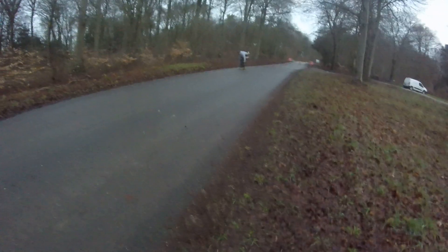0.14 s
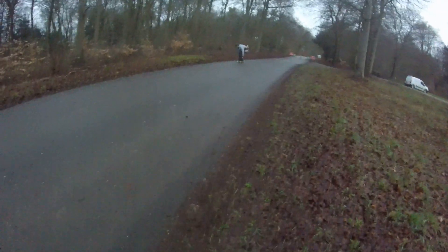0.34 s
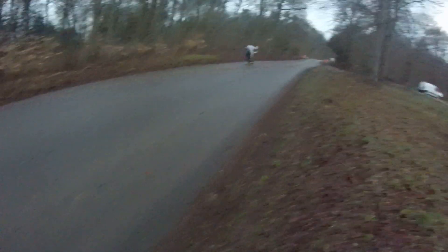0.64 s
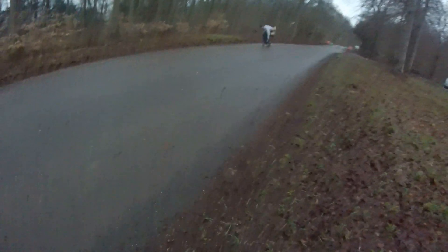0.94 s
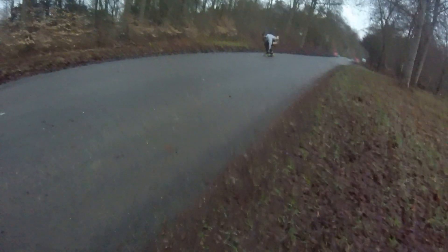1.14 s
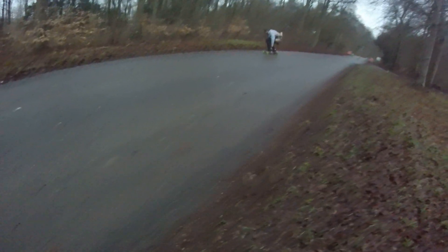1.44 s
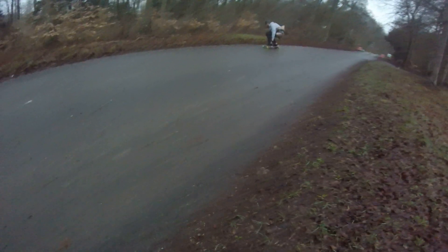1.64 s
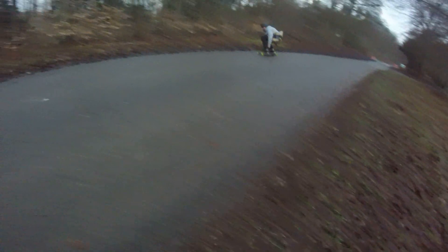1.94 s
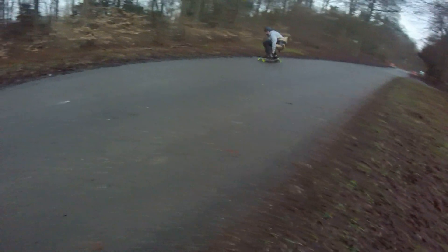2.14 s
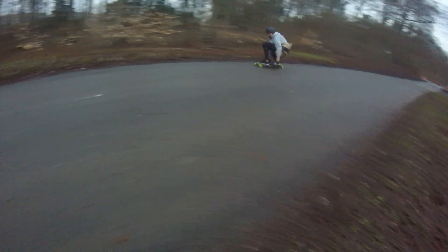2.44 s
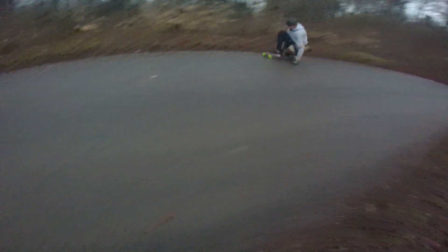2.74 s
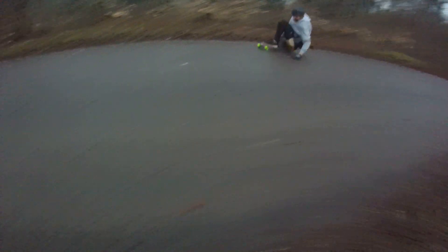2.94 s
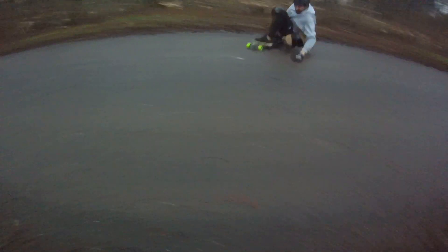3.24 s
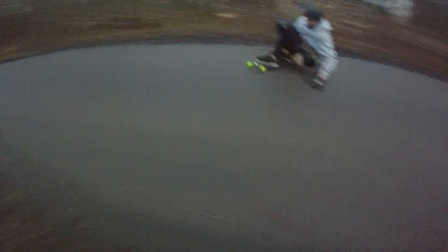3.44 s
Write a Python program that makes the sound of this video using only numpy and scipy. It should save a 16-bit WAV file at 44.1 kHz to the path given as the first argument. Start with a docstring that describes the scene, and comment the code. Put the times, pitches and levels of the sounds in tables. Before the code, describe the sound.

Sliding skateboard wheels burst into a loud, rough screech near the end and keep juddering until the cut; before that, only quiet rolling, uneven wind rumble, tiny ticks and soft knocks, heard through a boxy camera case.

```python
"""Low uneven wind rumble and faint rolling hiss open the scene, with a bird chirp, grit ticks and soft knocks.
A longboarder rolls down a damp wooded road toward a hand-held camera in a closed plastic housing.
The board then breaks into a slide: a loud grainy scrape with squeal, chatter and dense ringing jolts.
Hiss, grit, jolts and the main scrape are noise or impulses through the housing's peaks and dips;
wind, air, drone, knocks, bird, squeak, squeal, chatter and thrum are added without that filter."""
import sys
import numpy as np
from scipy import signal
from scipy.fft import rfft, irfft
from scipy.io import wavfile
from scipy.ndimage import uniform_filter1d

SR = 44100
rng = np.random.default_rng(int(sys.argv[2]) if len(sys.argv) > 2 else 0)


def store_pcm(level_fs):
    """Save levels as 16-bit WAV."""
    pcm = np.round(np.clip(level_fs, -1, 1) * 32767).astype(np.int16)
    wavfile.write(sys.argv[1], SR, np.atleast_2d(pcm).T)


N = 158760
TIME = np.arange(N) / SR


def amp(db):
    """dB to gain."""
    return 10 ** (np.asarray(db) / 20)


def rms_one(x):
    """Scale to rms 1."""
    return x / np.sqrt(np.mean(x ** 2) + 1e-20)


def in_time(rows):
    """Interpolate table columns linearly over time."""
    time_s, *columns = np.transpose(rows)
    return [np.interp(TIME, time_s, column) for column in columns]


def band(x, low_hz, high_hz, order=4):
    """Butterworth band-pass."""
    sos = signal.butter(order, [low_hz, high_hz], "band", fs=SR, output="sos")
    return signal.sosfilt(sos, x)


def coloured(x, points):
    """Shape a spectrum by (frequency [Hz], gain [dB]) points on a log-frequency axis."""
    point_hz, point_db = np.transpose(points)
    bin_hz = np.arange(N // 2 + 1) * SR / N
    gain_db = np.interp(np.log(bin_hz + 1), np.log(point_hz), point_db)
    return irfft(rfft(x) * amp(gain_db), N)


def drift(corner_hz):
    """Random low-passed curve, rms 1; the first second is dropped to let the filter settle."""
    r = np.exp(-2 * np.pi * corner_hz / SR)
    slow = signal.lfilter([1], [1, -2 * r, r * r], rng.standard_normal(N + SR))
    return rms_one(slow[SR:])


# Housing resonances and dips: (frequency [Hz], width [Hz], gain [dB])
HOUSING_PEAKS = [(1387.6, 330, 20.5), (1577.4, 300, 17.5), (1483, 114, 4), (1740, 75, -3.5),
                 (1844, 130, 3.5), (1180, 90, -2.5), (2464, 330, 14.5), (2795, 290, -4), (3126, 620, 18.5),
                 (3612, 260, 6), (4630, 360, -7.5), (5350, 126, -26.5), (5890, 980, 7), (6515, 250, 6),
                 (6820, 720, -5.5), (7250, 320, -10.5), (7810, 1100, 6), (8780, 2200, 12), (10500, 330, 1),
                 (11470, 1040, 5), (12600, 460, -7), (13400, 500, -3), (15100, 1100, -17)]
# Overall slope through the housing wall: (frequency [Hz], gain [dB])
WALL_SLOPE = [(300, 18), (1500, 5), (4000, 3), (8000, -9), (10000, -22.5), (15000, -23.5)]


def housing(x):
    """Closed plastic box: a chain of peaking filters, then the slope of its wall."""
    for hz, width_hz, db in HOUSING_PEAKS:
        a, w = amp(db / 2), 2 * np.pi * hz / SR
        k = np.sin(w) * width_hz / hz / 2
        numerator = [1 + k * a, -2 * np.cos(w), 1 - k * a]
        denominator = [1 + k / a, -2 * np.cos(w), 1 - k / a]
        x = signal.lfilter(numerator, denominator, x)
    return coloured(x, WALL_SLOPE)


def housed_part(x, low_hz, high_hz, reference):
    """One band of a sound through the housing, scaled so that steady unit noise has rms 1."""
    return band(housing(x), low_hz, high_hz) / np.std(band(reference, low_hz, high_hz))


def scrape(grains_per_s, spread_db, grain_share, patchy_db):
    """Friction: smooth noise mixed by power with uneven grains, swelling in patches; rms 1."""
    sizes = amp(spread_db * np.minimum(rng.exponential(1, N), 5)) * rng.choice([-1, 1], N)
    chance = grains_per_s * amp(4.0 * drift(40.0)) / SR
    grains = rms_one(sizes * (rng.random(N) < chance))
    share = np.clip(grain_share, 0, 1)
    mix = np.sqrt(share) * grains + np.sqrt(1 - share) * rng.standard_normal(N)
    return rms_one(mix * amp(patchy_db * drift(57.0)))


# Distant air and microphone hiss: (frequency [Hz], relative spectral level [dB])
AIR_COLOUR = [(60, 2.5), (150, -0.5), (400, -6.5), (1000, -9.5), (2500, -16), (6000, -23), (11000, -37.5),
              (15000, -43)]
AIR_DB = -59.5


def air():
    """Steady broad hiss: coloured noise at a fixed rms level."""
    colour = [(16, -16)] + AIR_COLOUR
    return amp(AIR_DB) * rms_one(coloured(rng.standard_normal(N), colour))


# Level of the wind rumble on the microphone: (time [s], level [dB])
WIND_LEVEL = [(0.0, -58), (0.06, -53), (0.09, -75), (0.12, -49.5), (0.37, -55.5), (0.67, -43), (0.74, -54),
              (0.92, -46.5), (1.3, -55.5), (1.33, -51), (1.63, -58.5), (2.67, -54), (2.69, -59),
              (2.74, -47.5), (2.98, -59.5), (3.6, -51.5)]
# Wind spectrum: (frequency [Hz], relative spectral level [dB])
WIND_SPECTRUM = [(8.8, -45), (15, -1.5), (32, 2.5), (52, 1.5), (66, -5), (85, -13.5), (130, -24),
                 (170, -61)]
WIND_EVENNESS = 0.33  # 0 leaves the lumps, 0.5 flattens the running rms


def wind():
    """Low lumpy rumble: partly levelled low noise that follows the level curve."""
    level_db, = in_time(WIND_LEVEL)
    lumpy = coloured(rng.standard_normal(N), WIND_SPECTRUM)
    running_power = uniform_filter1d(lumpy ** 2, size=6000)
    rumble = lumpy / running_power ** WIND_EVENNESS
    return rms_one(rumble) * amp(uniform_filter1d(level_db, size=600))


CHIRP_START_S, CHIRP_LENGTH_S = 0.148, 0.07
CHIRP_FROM_HZ, CHIRP_TO_HZ, CHIRP_PEAK_DB = 3620, 3320, -67


def bird():
    """One faint falling whistle: a gliding sine under a rounded envelope."""
    progress = np.clip((TIME - CHIRP_START_S) / CHIRP_LENGTH_S, 0, 1)
    hz = CHIRP_FROM_HZ + (CHIRP_TO_HZ - CHIRP_FROM_HZ) * progress
    envelope = np.sqrt(np.sin(np.pi * progress) + 1e-12) * (progress < 1)
    return amp(CHIRP_PEAK_DB) * envelope * np.sin(2 * np.pi * np.cumsum(hz) / SR)


# Soft knocks on the housing: (time [s], push peak before the high-pass [dB])
KNOCK_PUSHES = [(0.069, -43), (2.406, -38.5), (2.559, -40), (2.568, -37.5), (2.656, -39), (2.787, -37.5),
                (2.865, -46), (2.911, -41), (2.963, -34.5), (3.03, -44), (3.218, -45), (3.258, -44),
                (3.472, -36)]
KNOCK_LOW_HZ, KNOCK_CONTACT_S = 151, 0.0013


def knocks():
    """Dull bumps: one sine-squared push each, high-passed to drop the deepest bass."""
    push = np.full(N, 1e-18)
    for start_s, db in KNOCK_PUSHES:
        progress = np.clip((TIME - start_s) / KNOCK_CONTACT_S, 0, 1)
        push += amp(db) * np.sin(np.pi * progress) ** 2
    return signal.sosfilt(signal.butter(2, KNOCK_LOW_HZ, "high", fs=SR, output="sos"), push)


# Tones of the squeak: (frequency [Hz], level of the steady tone [dB])
SQUEAK_TONES = [(1480, -49.5), (2600, -57.5), (3100, -59), (4100, -57.5), (7000, -63)]
SQUEAK_START_S, SQUEAK_LENGTH_S = 0.666, 0.022


def squeak():
    """A small part squeaks once: tones, each with a rough lower neighbour, swell and stop."""
    progress = np.clip((TIME - SQUEAK_START_S) / SQUEAK_LENGTH_S, 0, 1)
    tones = np.zeros(N)
    for hz, db in SQUEAK_TONES:
        tones += amp(db) * np.sin(2 * np.pi * hz * TIME)
        tones += amp(db + 2.1 * drift(300.0)) * np.sin(2 * np.pi * 0.87 * hz * TIME)
    return tones * np.sin(np.pi * progress) ** 2


# Low drone of wheels on the road: (time [s], level before trim [dB])
DRONE_LEVEL = [(0.0, -64.5), (2.02, -63), (3.53, -51.5), (3.57, -60), (3.6, -47)]
DRONE_TRIM_DB, DRONE_DRIFT_DB = -3.5, 1.34


def drone():
    """Low road noise: an unsteady noise band that swells as the board comes near."""
    level_db, = in_time(DRONE_LEVEL)
    low = band(rng.standard_normal(N), 110, 360, order=2)
    return amp(level_db + DRONE_TRIM_DB + DRONE_DRIFT_DB * drift(34.0)) * rms_one(low)


# Rolling wheels and road air: (time [s], level [dB], treble against level [dB])
ROLL_LEVEL = [(0.0, -60, -18), (0.16, -59.5, -18), (0.17, -58.5, -13), (0.21, -62, -18), (0.63, -62.5, -9),
              (1.27, -62.5, -11.5), (2.1, -62, -8), (2.62, -61, -5), (2.74, -60, -8)]
# Highest hiss while rolling: (time [s], level [dB])
ROLL_TOP_LEVEL = [(0.0, -82), (1.59, -78), (2.74, -75)]
# Ring, middle, treble and top bands of rolling: (low edge [Hz], high edge [Hz])
ROLL_BANDS_HZ = [(1000, 1900), (1900, 5000), (5000, 10000), (10000, 18000)]
ROLL_GRAINS_PER_S, ROLL_GRAIN_SPREAD_DB = 900, 5.5
ROLL_GRAIN_SHARE, ROLL_PATCHY_DB = 0.19, 0.5
TREBLE_GRAIN_SHARE, TREBLE_PATCHY_DB = 0.58, 3
ROLL_MIDDLE_DB = -11.0  # against level


def rolling(reference):
    """Tyre hiss on damp tarmac: friction noise in four housed bands, grittiest in the treble."""
    level_db, treble_db = in_time(ROLL_LEVEL)
    top_db, = in_time(ROLL_TOP_LEVEL)
    plain = (ROLL_GRAIN_SHARE, ROLL_PATCHY_DB)
    gritty = (TREBLE_GRAIN_SHARE, TREBLE_PATCHY_DB)
    levels_db = [level_db, level_db + ROLL_MIDDLE_DB, level_db + treble_db, top_db]
    out = np.zeros(N)
    for db, texture, edges_hz in zip(levels_db, [plain, plain, gritty, plain], ROLL_BANDS_HZ):
        hiss = scrape(ROLL_GRAINS_PER_S, ROLL_GRAIN_SPREAD_DB, *texture)
        out += amp(db) * housed_part(hiss, *edges_hz, reference)
    return out


CRACKLE_PER_S, CRACKLE_DB = 150, 17  # gain against the rolling treble
CRACKLE_CYCLES = 22  # to fall 60 dB


def crackle(reference):
    """Sparse tiny stones: random impulses dealt among ten short high resonators."""
    level_db, treble_db = in_time(ROLL_LEVEL)
    sizes = amp(2.3 * np.minimum(rng.exponential(1, N), 4))
    hits = sizes * (rng.random(N) < CRACKLE_PER_S * amp(4.0 * drift(6.0)) / SR)
    dealt = rng.integers(0, 10, N)
    rings = np.zeros(N)
    for k, hz in enumerate(np.geomspace(5200, 9500, 10)):
        r, w = amp(-60 * hz / (CRACKLE_CYCLES * SR)), 2 * np.pi * hz / SR
        resonator = [1, -2 * r * np.cos(w), r * r]
        rings += signal.lfilter([0, np.sin(w)], resonator, hits * (dealt == k) + 1e-18)
    return amp(level_db + treble_db + CRACKLE_DB) * housed_part(rings, 1900, 18000, reference)


# Grit ticks: (time [s], peak level [dB],
# low, middle, treble and top parts against it [dB each], fall time constant [s])
GRIT_TICKS = [(0.1728, -43, -17, -13, -9.5, -11.5, 0.0025), (0.1857, -46, -12, -15, -7, -14, 0.0018),
              (0.2827, -49, -10, -3, -15, -22, 0.0033), (0.3006, -53, -15, -4.5, -9, -19, 0.0036),
              (0.412, -51, -5, -13, -15, -16, 0.0037), (0.5555, -50, -20, -15, -15, -14, 0.0022),
              (0.672, -49, -11, -4, -18, -18, 0.0057), (0.686, -49, -2.5, -7, -20, -10.5, 0.0077),
              (1.0172, -47.5, -0.5, -9, -24, -16, 0.0073), (1.0642, -55, -14, -6, -10, -11, 0.003),
              (1.086, -48.5, -17, -12, -11, -13, 0.0035), (1.1419, -42, -17, -6, -21, -11, 0.0028),
              (1.2288, -52, -1, -7, -15, -16, 0.003), (1.284, -50.5, -8, -6, -14, -15, 0.0024),
              (1.3736, -44.5, -9.5, -16, -25, -9.5, 0.0021), (1.4698, -45.5, -1.5, -7.5, -15, -21, 0.004),
              (1.585, -51.5, -16, -4, -13, -20, 0.002), (1.6134, -54, -21, -27, -6, -13, 0.0028),
              (1.686, -47, -10, -16, -13, -14, 0.003), (1.702, -43.5, -18, -5, -12, -17, 0.002),
              (1.7122, -40.5, -12, -18, -9, -11, 0.0022), (1.84, -49, -16, -25, -16, -9.5, 0.002),
              (1.9124, -52, -28, -7, -7, -14, 0.0033), (1.962, -49, -19, -8, -13.5, -18, 0.0026),
              (2.0472, -47, -12, -15, -9, -13, 0.0046), (2.331, -48, -11, -11, -12, -25, 0.003),
              (2.3808, -48, -6, -18, -16, -13, 0.0039), (2.4575, -43, -13, -9, -13, -27, 0.0037),
              (2.6076, -51.5, -4, -16, -19, -4.5, 0.0032), (2.6483, -46, -4, -7.5, -15, -18, 0.011),
              (3.1004, -28.5, -30, -2, -8, -16, 0.004), (3.26, -26, -6, -3.5, -8.5, -20, 0.0024),
              (3.2962, -31.5, -20, -6, -7, -20, 0.0037)]
# Low, middle, treble and top bands of a tick: (low edge [Hz], high edge [Hz])
TICK_BANDS_HZ = [(1000, 1900), (1900, 5000), (5000, 7200), (7200, 18000)]
TICK_RISE_S = 0.00015


def ticks(reference):
    """Grit under the wheels: short housed noise puffs, each with its own balance of four bands."""
    t = np.arange(SR // 20) / SR
    puffs = np.zeros((len(TICK_BANDS_HZ), N + len(t)))
    for start_s, db, *parts_db, fall_s in GRIT_TICKS:
        shape = (1 - np.exp(-t / TICK_RISE_S)) * np.exp(-t / fall_s)
        i = int(start_s * SR)
        puffs[:, i:i + len(t)] += amp(db + np.array(parts_db))[:, None] * shape / shape.max()
    out = np.zeros(N)
    for puff, edges_hz in zip(puffs, TICK_BANDS_HZ):
        noise = puff[:N] * rng.choice([-1, 1], N) + 1e-18
        out += housed_part(noise, *edges_hz, reference)
    return out


# Road jolts, dense once the wheels catch and let go in the slide: (time [s], peak level [dB])
CATCH_JOLTS = [(0.07, -44), (0.3267, -46.5), (0.388, -45.5), (0.4414, -49.5), (0.613, -48), (0.628, -48),
               (1.3295, -47), (2.5613, -42), (2.578, -47), (2.6255, -43), (2.79, -36), (2.85, -34),
               (2.8682, -34), (2.8838, -42), (2.9356, -30), (2.9538, -30), (2.9636, -27.5), (2.9707, -27),
               (3.065, -25.5), (3.084, -28), (3.0997, -24.5), (3.1152, -24.5), (3.127, -21), (3.1403, -26),
               (3.154, -31), (3.1673, -28), (3.1844, -29), (3.194, -26), (3.2035, -24), (3.2173, -26),
               (3.23, -24), (3.2625, -31), (3.3064, -22.5), (3.328, -26.5), (3.3407, -23.5), (3.3954, -27),
               (3.428, -30), (3.4532, -25.5), (3.4739, -23), (3.521, -28)]
# Ring, middle and treble bands; jolts use the first: (low edge [Hz], high edge [Hz])
SLIDE_BANDS_HZ = [(1000, 1900), (1900, 5000), (5000, 18000)]


def catches(reference):
    """Impulses of random sign set the main housing resonance ringing."""
    start_s, db = np.transpose(CATCH_JOLTS)
    jolts = np.zeros(N)
    jolts[(start_s * SR).astype(int)] = amp(db) * rng.choice([-1, 1], len(start_s))
    ring_hz = SLIDE_BANDS_HZ[0]
    unit_ring = housed_part(np.arange(N) == SR, *ring_hz, reference)
    return housed_part(jolts + 1e-18, *ring_hz, reference) / np.abs(unit_ring).max()


# Wheel chatter: (time [s], level before envelope and flutter [dB], pitch [Hz])
CHATTER_RINGS = [(2.7935, -34, 2310), (2.8764, -35, 3640), (2.9721, -26.5, 3076), (3.0669, -29.5, 3410),
                 (3.1857, -25.5, 3070), (3.2605, -28.5, 3060), (3.3298, -26, 3116), (3.3687, -26.5, 2950),
                 (3.4381, -32.5, 2280), (3.4675, -26, 3150), (3.5279, -38, 3040), (3.5718, -32, 3140)]
CHATTER_RISE_S, CHATTER_T60_S, CHATTER_FLUTTER_DB = 0.0018, 0.04, 3.8


def chatter():
    """Each slip of the wheels rings briefly: a decaying sine roughened by fast level flutter."""
    t = np.arange(SR // 20) / SR
    out = np.zeros(N + len(t))
    for start_s, db, hz in CHATTER_RINGS:
        shape = (1 - np.exp(-t / CHATTER_RISE_S)) * amp(-60 * t / CHATTER_T60_S)
        i = int(start_s * SR)
        out[i:i + len(t)] += amp(db) * shape * np.sin(2 * np.pi * hz * t)
    return out[:N] * amp(CHATTER_FLUTTER_DB * drift(280.0))


# Squeal of the sliding wheels: (time [s], pitch [Hz], level against the scrape [dB])
SQUEAL_GLIDE = [(2.78, 1480, -18), (2.87, 1430, -5), (3.05, 1480, -11), (3.12, 1495, 5.5), (3.2, 1521, 1),
                (3.32, 1567, -3), (3.37, 1416, -15), (3.46, 1402, -3.5), (3.6, 1389, 1.5)]
SQUEAL_POLE_WIDTH_HZ = 36.3


def squeal():
    """Wavering strand: two slow noises modulate a carrier that glides with the slip."""
    hz, db = in_time(SQUEAL_GLIDE)
    r = np.exp(-np.pi * SQUEAL_POLE_WIDTH_HZ / SR)
    slow_cos, slow_sin = signal.lfilter([1], [1, -2 * r, r * r], rng.standard_normal((2, N)))
    phase = 2 * np.pi * np.cumsum(hz) / SR
    return amp(db) * rms_one(slow_cos * np.cos(phase) + slow_sin * np.sin(phase))


STREAK_DB, STREAK_CORNER_HZ = 3.0, 28.0  # depth shrinks for bands ending above 5600 Hz


def streaked(x):
    """Narrow bands above the main ring swell and fade independently; rms 1."""
    edges_hz = np.geomspace(1900, 15200, 19)
    out = signal.sosfilt(signal.butter(2, edges_hz[0], "low", fs=SR, output="sos"), x)
    for k, (low_hz, high_hz) in enumerate(zip(edges_hz, edges_hz[1:])):
        depth_db = STREAK_DB * min(1, 5600.0 / high_hz)
        swell = (-1) ** k * amp(depth_db * drift(STREAK_CORNER_HZ))  # alternate polarity
        out = out + swell * band(x, low_hz, high_hz, order=2)
    return rms_one(out)


# Slide: (time [s], level [dB], middle against level [dB], treble against level [dB])
SLIDE_LEVEL = [(2.745, -61, -9, -3), (2.773, -53.5, 1, 2), (2.791, -42, -8.5, -9.5), (2.941, -39, -8, -12),
               (3.081, -38.5, -7, -12.5), (3.093, -40.5, -6, -15), (3.099, -32.5, -8.5, -14.5),
               (3.177, -37.5, -2, -12), (3.199, -34, -8, -13.5), (3.289, -41, -2, -11),
               (3.305, -34.5, -9, -18), (3.393, -35.5, -9, -14), (3.481, -36, -7.5, -11.5),
               (3.493, -39, -7.5, -10), (3.569, -38.5, -6, -12.5), (3.6, -42, -7, -9.5)]
SLIDE_GRAINS_PER_S, SLIDE_GRAIN_SPREAD_DB = 3700, 3.5
RASP_GRAIN_SHARE, RASP_PATCHY_DB = 0.32, 1
RING_GRAIN_SHARE, RING_PATCHY_DB = 0.15, 0.5
SLIDE_ATTACK_S, JUDDER_DB, THRUM_DB = 0.0079, 1.06, -17  # thrum against smoothed level


def slide(reference):
    """Urethane tears sideways over stones: smooth ring, juddering rasp, dull thrum and squeal."""
    level_db, middle_db, treble_db = in_time(SLIDE_LEVEL)
    start = np.clip((TIME - SLIDE_LEVEL[0][0]) / SLIDE_ATTACK_S, 0, 1)
    judder = amp(JUDDER_DB * drift(66.0))
    grain = (SLIDE_GRAINS_PER_S, SLIDE_GRAIN_SPREAD_DB)
    ring = scrape(*grain, RING_GRAIN_SHARE, RING_PATCHY_DB)
    rasp = judder * streaked(scrape(*grain, RASP_GRAIN_SHARE, RASP_PATCHY_DB))
    levels_db = [level_db, level_db + middle_db, level_db + treble_db]
    out = np.zeros(N)
    for x, db, edges_hz in zip([ring, rasp, rasp], levels_db, SLIDE_BANDS_HZ):
        out += amp(db) * housed_part(x, *edges_hz, reference)
    thrum = rms_one(band(judder * rng.standard_normal(N), 300, 1100, order=2))
    thrum_db = uniform_filter1d(level_db, size=6000) + THRUM_DB
    return start * (out + amp(level_db) * squeal() + amp(thrum_db) * thrum)


def scene():
    """Sum all sources, mono; housed noise is the shared level reference."""
    reference = housing(rng.standard_normal(N))
    background = air() + wind() + bird() + knocks() + squeak()
    road = drone() + rolling(reference) + crackle(reference) + ticks(reference)
    sliding = catches(reference) + chatter() + slide(reference)
    return (background + road + sliding)[None]


CUTOFF_HZ = 15350  # 60 dB down from here up


def record(dry):
    """Cut the top with a steep low-pass."""
    return signal.sosfilt(signal.cheby2(24, 60, CUTOFF_HZ, fs=SR, output="sos"), dry)


dry = scene()
out = record(dry)
store_pcm(out)
```